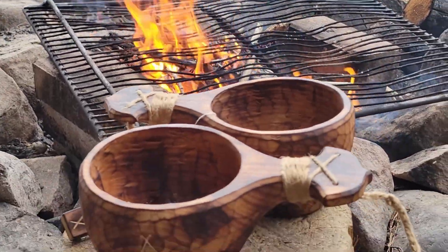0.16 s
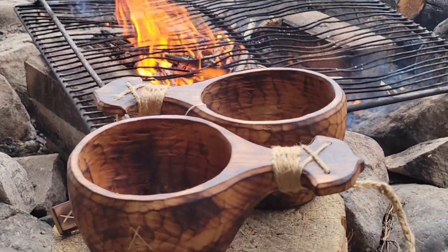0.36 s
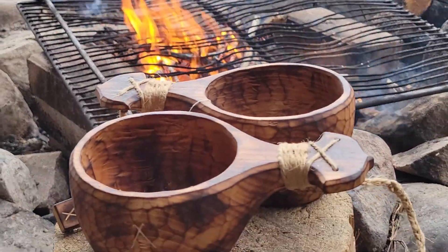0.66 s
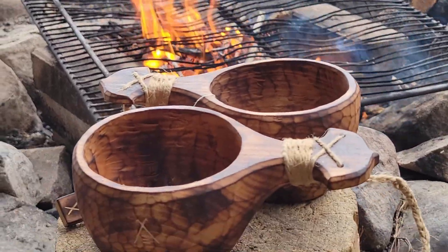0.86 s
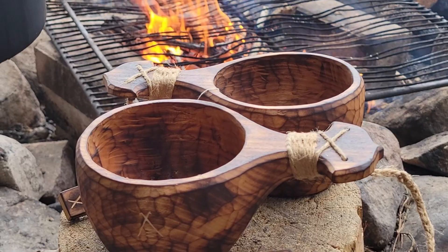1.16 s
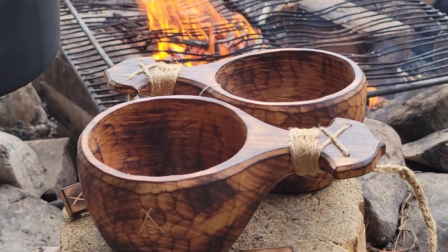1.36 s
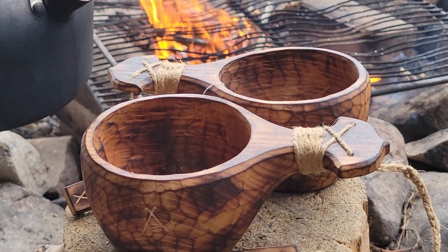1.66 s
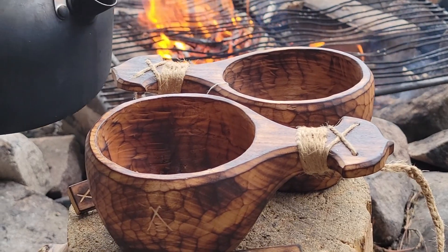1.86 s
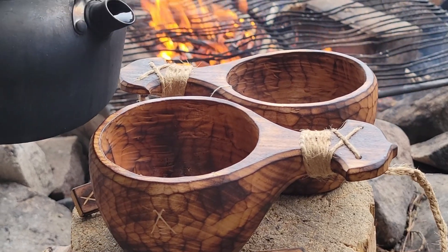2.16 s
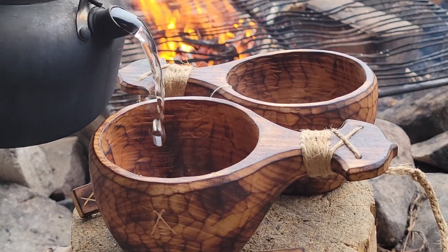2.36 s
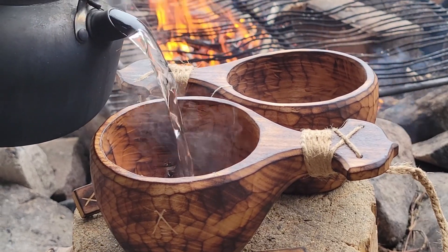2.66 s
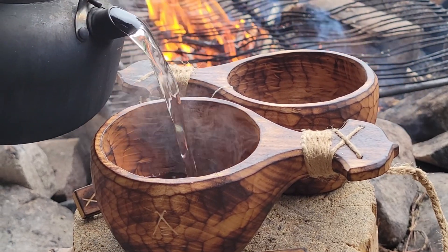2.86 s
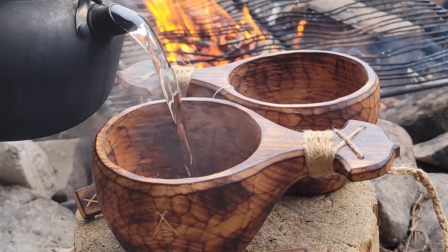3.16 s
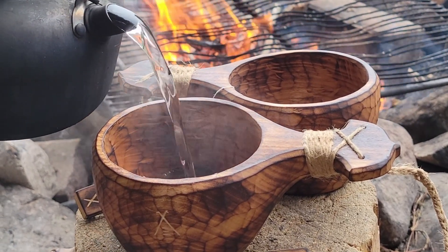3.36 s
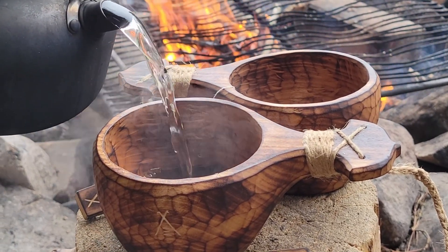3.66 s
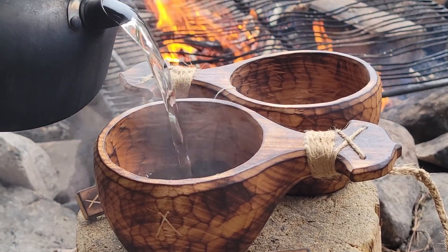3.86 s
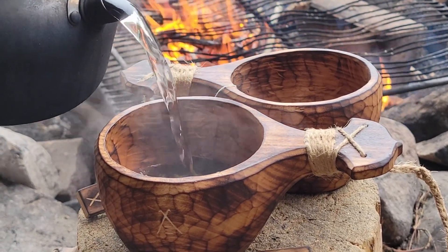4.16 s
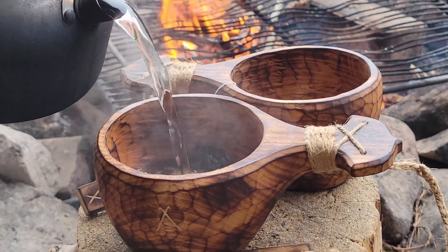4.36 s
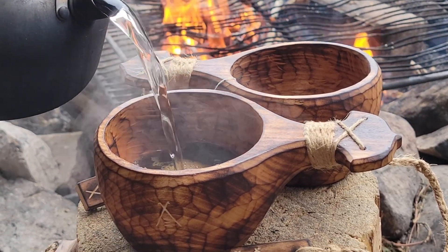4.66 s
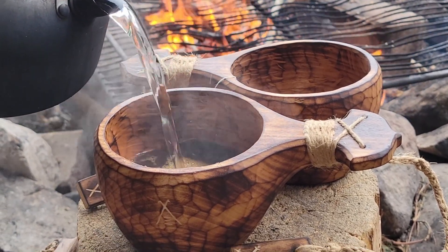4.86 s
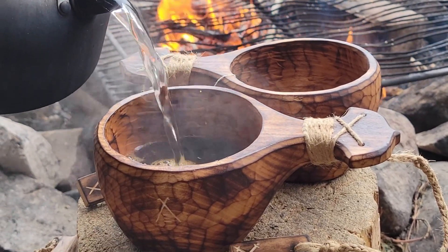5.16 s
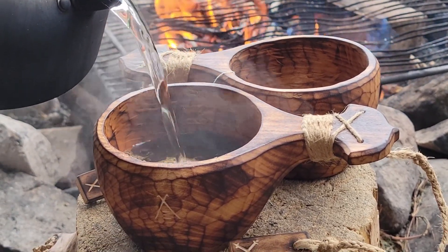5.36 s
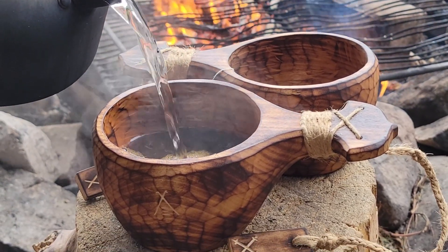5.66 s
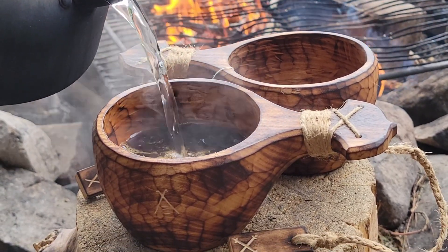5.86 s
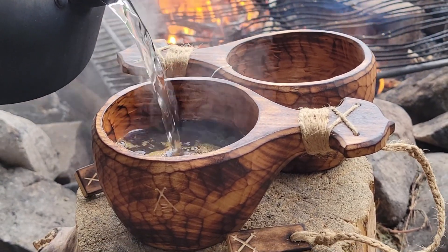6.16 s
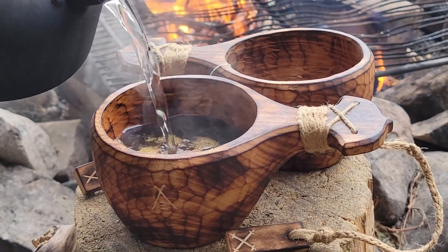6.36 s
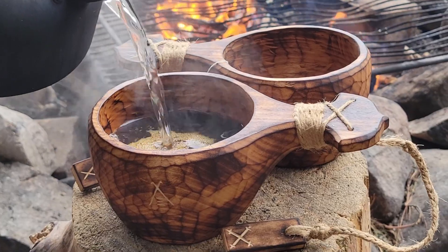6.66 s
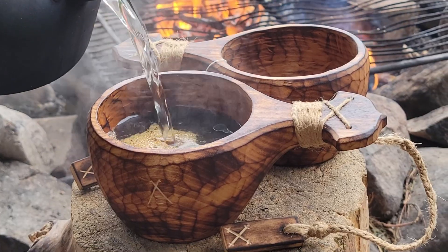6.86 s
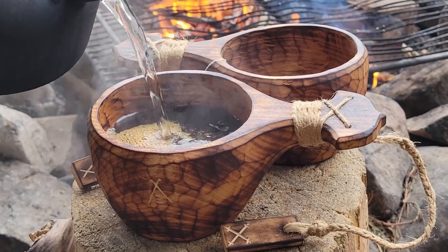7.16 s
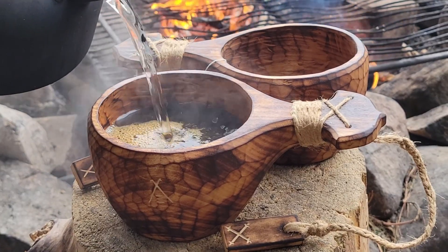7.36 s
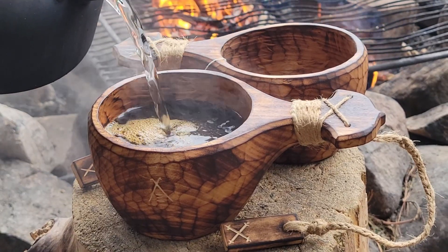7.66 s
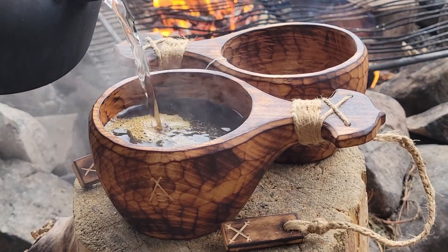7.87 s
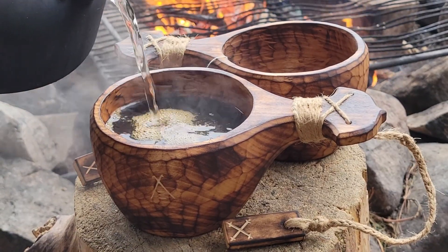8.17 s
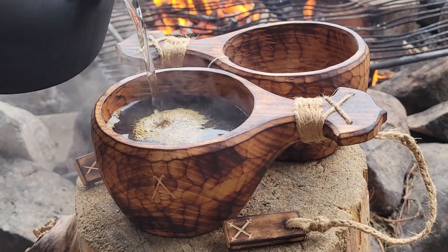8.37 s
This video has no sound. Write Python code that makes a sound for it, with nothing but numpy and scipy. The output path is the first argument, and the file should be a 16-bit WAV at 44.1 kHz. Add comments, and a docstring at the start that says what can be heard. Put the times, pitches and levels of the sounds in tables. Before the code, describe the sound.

Close stereo at an outdoor campfire: sharp pops, fine ticks and a soft low flutter run throughout. At first clothes rustle, shoes scuff on grit and wood knocks hard. From about two and a half seconds, hot water trickles from a kettle into a wooden cup, hollow drumming drops giving way to a fuller bubbly patter. A bird gives five short, falling, raspy-ended calls. Light wind bumps the microphone.

```python
"""A campfire crackles and flutters in light wind as clothes rustle and shoes scuff, close to a two-port microphone.
Wood knocks; then hot water patters from a kettle into a wooden cup, and a bird calls five times.
Fire, wind, cloth, grit and spray are shaped noise; cup and wood ring in modes; bubbles are damped tones.
Each call is a harmonic stack that slides down and ends in jitter and rasp."""
import sys
import numpy as np
from scipy import signal
from scipy.fft import rfft, irfft
from scipy.io import wavfile

SR = 44100
rng = np.random.default_rng(int(sys.argv[2]) if len(sys.argv) > 2 else 0)


def transcribe(signal):
    """Save signal, clipped to [-1, 1], as a 16-bit WAV file at the path in sys.argv[1]."""
    frames = np.atleast_2d(signal).T
    limited = np.clip(frames, -1, 1)
    pcm = np.round(limited * 32767).astype(np.int16)
    wavfile.write(sys.argv[1], SR, pcm)


N = 374850
T = np.arange(N) / SR
PORT_LAG_S, CUP_LAG_S = 0.00031, 0.00011  # delay of the right port: campsite, cup nearly in front

# Filling of the cup. Each row: time in seconds, factor on the cup's pitches, drumming of the wooden bottom in dB.
FILLING = [(2.5, 0.98, 10), (3.1, 1.07, 8), (3.8, 0.97, 7), (4.6, 1.1, 2), (5.2, 1.07, -4),
           (6.5, 1.12, -0.5), (8.5, 1.16, 0)]


def amp(db):
    """Decibels to gain."""
    return 10 ** (np.asarray(db) / 20)


def unit(x):
    """Scales to rms 1."""
    return x / np.sqrt(np.mean(x ** 2) + 1e-20)


def curve(rows, axis=1, at=T):
    """One column of a table, joined by lines, over the whole time or at one moment."""
    rows = np.asarray(rows)
    return np.interp(at, rows[:, 0], rows[:, axis])


def colour(x, points):
    """Filters by a spectrum of (Hz, dB) points."""
    hz, db = np.transpose(points)
    size = x.shape[-1]
    f = np.fft.rfftfreq(size, 1 / SR)
    gain = amp(np.interp(np.log(f + 1), np.log(hz), db))
    return irfft(rfft(x) * gain, size)


def ring(x, hz, width_hz):
    """A resonance of gain 1 that can follow a moving pitch."""
    turn = np.exp(2j * np.pi * np.cumsum(hz * np.ones(x.shape[-1])) / SR)
    r = np.exp(-np.pi * width_hz / SR)
    baseband = signal.lfilter([1 - r], [1, -r], x / turn + 1e-18)
    return 2 * (turn * baseband).real


def wander(hz, size=N):
    """Slow chance of rms 1, up to the given rate."""
    f = np.fft.rfftfreq(size, 1 / SR)
    return unit(irfft(rfft(rng.standard_normal(size)) / (1 + (f / hz) ** 4), size))


def clicks(per_s, spread_db):
    """Random impulses of either sign, mostly small and a few large."""
    size = amp(spread_db * np.minimum(rng.exponential(1, N), 4))
    return size * rng.choice([-1, 1], N) * (rng.random(N) < per_s / SR)


def swells(rows):
    """Gain of strokes that each rise to a peak and fall: rows of (s, dB, rise s, fall s)."""
    power = 0
    for s, db, rise_s, fall_s in rows:
        side_s = np.where(T < s, rise_s, fall_s)
        power = power + amp(db) ** 2 * np.exp(-((T - s) / side_s) ** 2)
    return np.sqrt(power)


def pan(db):
    """Left and right gains of unit mean power, db apart."""
    return unit(amp([[db / 2], [-db / 2]]))


def ports(x, lag_s=PORT_LAG_S):
    """A sound from the left reaches the right port a little later."""
    t = np.arange(len(x)) / SR
    late = np.roll(x, round(lag_s * SR)) * (t >= lag_s)
    return np.array([x, late])


def scattered(left, right, hz):
    """Both ports share the sound well below hz; well above, each hears its own."""
    f = np.fft.rfftfreq(N, 1 / SR)
    same = 1 / np.sqrt(1 + (f / hz) ** 4)
    near, late = ports(left)
    far = irfft(same * rfft(late) + np.sqrt(1 - same ** 2) * rfft(right), N)
    return np.array([near, far])


def add(mix, s, sound):
    """Mixes a sound in at time s."""
    part = mix[:, max(round(s * SR), 0):][:, :sound.shape[1]]
    part += sound[:, :part.shape[1]]


def trees(x, t60):
    """Sparse, weak echoes from trunks and ground."""
    t = np.arange(SR // 2) / SR
    sparse = rng.standard_normal((2, len(t))) * (rng.random((2, len(t))) < .04)
    taps = sparse * amp(-60 * t / t60) * (t > .006)
    return signal.oaconvolve(x, taps / np.linalg.norm(taps[0]), axes=1)[:, :N]


def wind(trim_db=-2, buffet_db=0.5):
    """Gusts buffet the ports as low noise, partly common and partly each port's own."""
    # Each row: time in seconds, gust strength in dB before the trim.
    gusts = [(0, -54), (1.6, -55), (1.76, -37), (1.88, -47), (2.12, -34), (2.55, -58), (3.8, -63),
             (4.08, -40), (4.5, -74), (5.05, -39), (5.4, -48.5), (5.73, -28.5), (6.15, -38), (6.45, -36.5),
             (7.08, -52), (7.35, -38), (7.75, -34.5), (8.5, -40)]
    # Wind on the ports. Each row: frequency in Hz, level in dB.
    gust_spectrum = [(10, 4), (30, -13), (50, -1), (68, 4.5), (90, -1), (140, -26), (400, -37), (1000, -78)]
    noise = rng.standard_normal((2, N)) + 0.72 * rng.standard_normal(N)
    gust = unit(colour(noise, gust_spectrum))
    return gust * amp(curve(gusts) + trim_db + buffet_db * wander(9.7)) * pan(8.0)


def flames(roar_db=-43, flutter_db=1.5, apart=0.33):
    """Low noise of the flames flutters and flares up, mostly common to both ports."""
    # Flare-ups. Each row: peak in seconds, level in dB, rise in seconds, fall in seconds.
    flares = [(.55, -41, 0.074, 0.032), (2.94, -40.5, 0.021, 0.026), (4.27, -38, 0.018, 0.023),
              (7.64, -35.5, 0.029, 0.047), (7.88, -42.5, 0.1, 0.13)]
    # Each row: frequency in Hz, level in dB.
    roar_spectrum = [(25, -15), (60, 0.5), (115, 1), (170, -6), (240, -5), (290, -13), (350, -35.5),
                     (500, -23.5), (900, -71), (2000, -94)]
    noise = rng.standard_normal(N) + apart * rng.standard_normal((2, N))
    burn = np.hypot(amp(roar_db + flutter_db * wander(9.8)), swells(flares))
    return unit(colour(noise, roar_spectrum)) * burn


def embers(hiss_db=-51, tick_db=-59, per_s=110, spread_db=7.0, drift_db=1.6, flicker_db=2.05):
    """Sizzle of the logs as wavering noise, with many tiny damped ticks."""
    # Hiss. Each row: frequency in Hz, level in dB.
    hiss_spectrum = [(100, 12), (400, 13.5), (800, 7), (1300, 3.5), (2200, 0), (3300, 9.5), (4800, 3.5),
                     (7000, 10.5), (12000, -1.5), (16000, -4.5)]
    waver_db = drift_db * wander(1.1) + flicker_db * wander(43)
    hiss = unit(colour(rng.standard_normal((2, N)), hiss_spectrum)) * amp(hiss_db + waver_db)
    t, ticks = np.arange(400) / SR, np.zeros((2, N))
    for hz in np.geomspace(3000, 14000, num=8):
        burst = rng.standard_normal((2, len(t))) * np.exp(-t / 0.0001)
        tick = unit(burst) + unit(ring(burst, hz, hz / 4))
        ticks += signal.oaconvolve(clicks(per_s / 8, spread_db)[None], tick, axes=1)[:, :N]
    ticks = colour(ticks, [(800, 11), (2200, -24.0), (3200, 1), (16000, -9.5)])
    return hiss * pan(-2.5) + amp(tick_db) * unit(ticks) * pan(-25.0)


def bird(waver=0.0027, hoarse=0.051, break_s=0.017, rasp=0.72, flutter_db=2.5):
    """A clean nasal tone slides down through a fixed throat, then breaks into jitter and rasp."""
    # Calls, by their strong fourth harmonic. Each row: start in seconds, length in seconds, level in dB,
    # top in Hz, end in Hz, opening scoop in Hz, bend of the fall (1 = straight).
    calls = [(1.039, .39, -44, 3767, 3120, 130, .28), (1.601, 0.35, -42.5, 4010, 2978, 698, .44),
             (2.192, 0.37, -35.5, 3517, 3040, 277, 1.21), (4.276, .41, -44.5, 3505, 3053, 30, 0.97),
             (4.994, 0.38, -43.5, 3528, 2916, 40.4, 1.16)]
    # Throat. Each row: frequency in Hz, gain in dB.
    throat = [(1550, -28), (1750, -35), (2350, -19.5), (2620, -28), (2950, -3.5), (3520, -2), (3850, -13),
              (4100, -20.5), (4350, -28), (5000, -38), (6600, -51)]
    scoop_s, rise_s, fade_s, hoarse_s = 0.0228, 0.034, 0.059, 0.064
    out = np.zeros((2, N))
    for s, length, db, top_hz, end_hz, scoop_hz, bend in calls:
        t = np.arange(0, length, 1 / SR)
        fall_hz = top_hz + (end_hz - top_hz) * (t / length) ** bend
        pitch_hz = (fall_hz - scoop_hz * np.exp(-t / scoop_s)) / 4
        rough = .5 + .5 * np.tanh((t - length + hoarse_s) / (2 * break_s))
        jitter = (waver + hoarse * rough) * wander(410, len(t))
        turns = np.cumsum(pitch_hz * (1 + jitter)) / SR
        tone = 0
        for k in range(2, 9):  # moving air makes each harmonic fade in and out by itself
            throat_db = np.interp(k * pitch_hz, *np.transpose(throat))
            gain = amp(throat_db + flutter_db * wander(8.7, len(t)))
            tone = tone + gain * np.sin(2 * np.pi * k * turns)
        rasp_spectrum = [(1800, -52), (2700, -8), (3200, -2), (4000, 0), (4600, -12), (7000, -29)]
        noise = unit(colour(rng.standard_normal(len(t)), rasp_spectrum))
        voice = unit(tone) * (1 - rough / 2) + rasp * rough * noise
        envelope = np.minimum(t / rise_s, 1) * np.minimum((length - t) / fade_s, 1)
        add(out, s, ports(voice * envelope * amp(db)) * pan(-8.5))
    return out


def shuffle(grain=0.54):
    """Clothes rub and shoes grind on grit: dense tiny slips under each stroke."""
    # Swishes of clothing. Each row: peak in seconds, level in dB, rise in seconds, fall in seconds.
    swishes = [(.06, -37.5, 0.051, 0.019), (.16, -38.5, 0.067, 0.061), (.3, -45.5, .06, 0.05),
               (.59, -37.5, 0.031, 0.064), (.86, -41.5, 0.063, 0.047), (.935, -39.5, 0.038, 0.024)]
    # Rubbing cloth. Each row: frequency in Hz, level in dB.
    cloth_spectrum = [(150, 11.5), (500, 8.5), (1000, 7.5), (1600, 6.5), (2500, 2), (4000, 6), (7000, 4.5),
                      (11500, -4.5), (13500, -14), (16000, -15.5)]
    # Shoe scuffs. Each row: peak in seconds, level in dB, rise in seconds, fall in seconds.
    scuffs = [(0.129, -34, 0.0045, 0.0088), (.146, -25, 0.0025, 0.0039), (.184, -32, 0.0076, 0.014),
              (.355, -36, 0.015, 0.03), (0.548, -36.5, 0.016, 0.0077), (0.849, -36, 0.015, 0.013),
              (1.45, -27, .018, .015), (1.484, -21, 0.019, 0.021)]
    # Grit under the shoes. Each row: frequency in Hz, level in dB.
    grit_spectrum = [(120, -29), (300, -12), (420, -15.5), (570, -2), (680, -8.5), (740, -9), (820, -2),
                     (900, -2), (1200, -1), (1700, -5), (2100, -8.5), (2800, -23), (4000, -8),
                     (5200, -19.5), (7500, -26), (15000, -47)]
    rub_db, settle_s, settle_db_per_s = -48, 1.44, 10.5  # rubbing fades as the person settles

    def slips(per_s):
        return rng.standard_normal(N) + grain * unit(clicks(per_s, 5.2))

    rub = amp(rub_db - settle_db_per_s * np.maximum(T - settle_s, 0))
    cloth = unit(colour(scattered(slips(4000), slips(4000), 1400), cloth_spectrum))
    shoes = unit(colour(scattered(slips(1500), slips(2200), 2400), grit_spectrum))
    left, right = cloth * np.hypot(rub, swells(swishes)) + shoes * swells(scuffs)
    # the body around the microphone shades the left port near 5 kHz
    left = colour(left, [(1200, 1), (5000, -3.5), (14000, 7.5)])
    right = colour(right, [(1200, -1), (5000, 2.5), (14000, 7.5)])
    return np.array([left, right])


def knock():
    """Wood rings for a few cycles; a soft contact swells instead of snapping."""
    # Each row: start in seconds, level in dB, factor on pitch and decay rate, contact in ms.
    knocks = [(.1435, -33, 0.34, 1.5), (.1911, -10.5, 0.96, 0.24), (.5455, -27.5, 0.48, 1.8),
              (.5485, -19, 0.74, 1.2)]
    # Modes of the wood at factor 1. Each row: frequency in Hz, t60 in seconds, level in dB.
    wood = [(1230, .017, 5.5), (1320, 0.019, -15), (990, 0.0091, -35)]
    out, t = np.zeros((2, N)), np.arange(2500) / SR
    for s, level_db, factor, contact_ms in knocks:
        modes = 0
        for hz, t60, db in wood:
            modes = modes + amp(db - 60 * t * factor / t60) * np.sin(2 * np.pi * hz * factor * t)
        swell = 1 - np.exp(-(t * 1e3 / contact_ms) ** 2)
        add(out, s, amp(level_db) * ports(modes * swell))
    return out


def bubbles(low_hz, high_hz, per_s, cycles):
    """Trapped bubbles of many sizes, each a damped tone that rises as it nears the surface."""
    t, out = np.arange(1500) / SR, np.zeros((2, N))
    for hz in np.geomspace(low_hz, high_hz, num=16):
        tone = np.sin(2 * np.pi * hz * t * (1 + 3 * t))
        blip = tone * np.exp(-t * hz / cycles) * (1 - np.exp(-t * hz))
        train = signal.oaconvolve(clicks(per_s / 16, 2.8), blip)[:N]
        out += ports(train, CUP_LAG_S) * pan(rng.normal(0, 2))
    return unit(out)


def cup(drive):
    """Blows ring the cup; filling shifts its pitches and muffles the wooden bottom."""
    # Each row: frequency in Hz before the filling factor, width in Hz, level in dB, L-R in dB.
    modes = [(510, 88, -1.5, 13), (918, 153, -1, -10.5), (1022, 325, -5, 13), (1228, 95, 7.5, 8.5),
             (1585, 87, -5, -23), (2920, 670, -8.5, -6)]
    factor, drum = curve(FILLING), amp(curve(FILLING, axis=2))
    out = 0
    for hz, width_hz, db, side_db in modes:
        mode = drive
        for _ in range(2):  # two wider resonances in series
            mode = ring(mode, hz * factor, 1.43 * width_hz)
        bottom = drum if 700 < hz < 1200 else 1
        out = out + ports(amp(db) * mode * bottom, CUP_LAG_S) * pan(side_db)
    return out


def stream(per_s=600, spread_db=4.0, lumpy_db=3.5, drum_slope=1.22, gurgle_db=-7, spray_db=-14, fizz_db=-6):
    """The stream breaks into drops that patter in the cup, trap bubbles and throw fine spray."""
    # Fall into the cup. Each row: time in seconds, strength in dB.
    pour = [(2.45, -77), (2.7, -64.5), (3.05, -58.5), (3.35, -60.5), (3.6, -60), (3.8, -56.5), (4.5, -51),
            (5.0, -54), (5.65, -52), (6.05, -56.5), (6.7, -53), (7.1, -57.5), (7.5, -54), (7.9, -60.5),
            (8.5, -60.5)]
    # Bursts of small bubbles from air dragged under. Each row: peak in seconds, level in dB, length in seconds.
    fizzes = [(4.073, -44, .025), (8.043, -47.5, 0.034), (8.375, -59, 0.054)]
    flow, strength_db = amp(lumpy_db * wander(19)), curve(pour)
    drops = clicks(per_s, spread_db) * flow
    gurgle_gain = amp(drum_slope * curve(FILLING, axis=2) + gurgle_db)
    gurgle = bubbles(803, 1393, per_s=200, cycles=5) * flow * gurgle_gain
    bursts = swells([(s, db, length, length) for s, db, length in fizzes])
    fizz_gain = np.hypot(amp(strength_db + fizz_db), bursts)
    fizz = bubbles(2840, 3010, per_s=370, cycles=6.8) * flow * fizz_gain
    mist = rng.standard_normal((2, 200)) * np.exp(-np.arange(200) / 50)
    spray = signal.oaconvolve(drops[None], mist, axes=1)[:, :N]
    spray = colour(spray, [(300, -3), (1200, 42), (2200, -77), (3200, 18), (6500, 25.0), (15000, -24)])
    return amp(strength_db) * (unit(cup(drops)) + gurgle + amp(spray_db) * unit(spray)) + fizz


def splats(bubble_db=-1, slap_db=-3, slap_s=0.0051, tick_db=-18, tick_s=.0035, after_db=-15,
           after_s=0.027, scatter=0.12, tick_slope=1.1):
    """Larger lumps of water tick on the surface, slap the cup and trap a bubble, with smaller ones just after."""
    # Each row: start in seconds, level in dB, bubble pitch in Hz.
    lumps = [(2.784, -37.5, 1216), (2.995, -32.5, 990), (3.03, -31, 1290), (3.086, -27, 1210),
             (3.168, -35, 1380), (3.202, -37, 1040), (3.46, -34.5, 1290), (3.654, -40, 1340),
             (3.68, -28.5, 987), (3.726, -38, 1010), (3.769, -27.5, 1200), (3.83, -31, 930),
             (3.9, -34, 1310), (3.947, -30, 760), (4.039, -33.5, 1340), (4.095, -31.5, 1350),
             (4.13, -32, 1310), (4.196, -32.5, 900), (4.307, -31, 577), (4.321, -28, 840),
             (4.348, -22.5, 800), (4.379, -31.5, 1250), (4.529, -29, 590), (4.627, -26, 566),
             (4.666, -32, 1400), (4.943, -31, 1430), (5.024, -33.5, 1400), (5.262, -35.5, 1380),
             (5.479, -31.5, 1330), (5.686, -34, 1320), (5.761, -33, 1340), (5.931, -33, 1350),
             (6.237, -33, 1400), (6.318, -31.5, 1350), (6.351, -36, 1380), (6.378, -33.5, 1430),
             (6.417, -30, 1360), (6.473, -34, 1370), (6.518, -33.5, 1390), (6.556, -36, 1380),
             (6.674, -28.5, 1300), (6.723, -36, 1370), (6.894, -31, 1020), (7.087, -39.5, 1490),
             (7.447, -38.5, 530), (7.718, -37.5, 900), (8.34, -31, 1790)]
    # Side to which the cup throws a bubble. Each row: pitch in Hz, L-R in dB.
    beam = [(570, 4), (930, -6), (1250, 3), (1400, 18), (1840, 10)]
    # Lump hitting the surface. Each row: frequency in Hz, level in dB.
    tick_spectrum = [(500, -5), (1700, -1), (2400, -3), (3050, 7), (3800, -6), (7000, -4), (14000, -16)]
    out, slaps, t = np.zeros((2, N)), np.zeros((1, N)), np.arange(1500) / SR

    def plop(hz, cycles=3.5):
        tone = np.sin(2 * np.pi * hz * t * (1 + 2 * t))
        blip = tone * np.exp(-t * hz / cycles) * (1 - np.exp(-t / 0.00049))
        return ports(blip, CUP_LAG_S) * pan(np.interp(hz, *np.transpose(beam)))

    for s, db, hz in lumps:
        tick = colour(rng.standard_normal((2, len(t))), tick_spectrum) * np.exp(-t / tick_s)
        drum_db = curve(FILLING, axis=2, at=s)  # less drumming: louder ticks, weaker extra bubbles
        add(out, s, amp(db) * (amp(bubble_db) * plop(hz) + amp(tick_db - tick_slope * drum_db) * tick))
        for late, size in rng.random((3, 2)):
            small = plop(hz * (1 + scatter * (2 * size - 1)))
            add(out, s + after_s * late, amp(db + after_db + drum_db) * small)
        slap = unit(rng.standard_normal((1, len(t))) * np.exp(-t / slap_s))
        add(slaps, s, amp(db + slap_db) * slap)
    return out + cup(slaps[0])


def faint_pops(count=28):
    """Small pops at random moments, each with its own colour."""
    # Lowest and highest draw. Each row: level in dB, treble in dB, ring in Hz, decay in ms, L-R in dB.
    draw_range = [(-37, -7.5, 3050, 1.4, -19), (-34.5, 5, 7060, 4.4, -3)]
    low, high = np.array(draw_range)
    draw = rng.random((count, 6))
    return [(u[0] * N / SR, *(low + u[1:] * (high - low))) for u in draw]


def pops(treble_trim_db=1, ring_db=-2, ring_width_hz=450, tail_db=-23, tail_s=0.0091):
    """Gas pockets burst in the logs: a sharp crack, a short ring of split wood, scatter from the stones."""
    # Loud pops. Each row: time in seconds, level in dB, treble in dB before the trim, ring in Hz,
    # decay in ms (at least 0.3 is used), L-R in dB.
    loud_pops = [(0.143, -23.5, -14, 3850, 2, 5), (0.1912, -12.5, -7, 1420, 1.3, -8.5),
                 (0.4173, -21, -5.5, 7000, 2, -4), (0.7898, -17, 1, 5840, 2.9, -8),
                 (1.5518, -22, -20, 4130, 5.8, -4), (1.7164, -15, -3, 7400, 2.5, -5),
                 (1.8163, -45, 12, 3170, 2.9, -2), (1.8964, -30.5, -8, 3120, 4.2, 1),
                 (2.2558, -33.5, 5.5, 3630, 1.5, -8), (2.446, -33.5, 11.5, 3250, 1.4, -6),
                 (2.4967, -28, -5, 3220, 5, -3), (3.2043, -32, -3, 7700, 3.2, -5),
                 (3.453, -29, -7, 7340, 1.9, -1), (3.682, -37.5, 7.5, 5900, 5.2, -5),
                 (3.7737, -34.5, -4, 5680, 1.6, -7), (3.8345, -38, -14, 6040, 1.4, -10),
                 (3.9027, -32, 0, 5500, 4.5, -5), (4.063, -30.5, -20, 2470, 4.7, -7),
                 (4.191, -27, -6, 2900, 13, -1), (4.298, -29, -26, 3500, 1.9, 17),
                 (4.338, -28.5, -6, 4650, 5.1, -5), (4.357, -30.5, -5, 3360, 2.6, 0),
                 (4.4483, -35, -0.5, 3280, 1.9, -5), (4.6434, -20, -18, 3860, 2.4, -7),
                 (4.763, -27, -18, 3800, 2.7, -1), (5.1314, -21, -7.5, 4330, 3.8, -5),
                 (5.2223, -27.5, -4, 3150, 1.7, -4), (5.3364, -25, -20, 5400, 1.5, 3),
                 (5.451, -28, -11, 7600, 4.7, -8), (6.0793, -38, 3, 6590, 3.7, -17),
                 (6.2585, -35.5, 6.5, 7500, 1.9, -9), (6.418, -27, -27, 1830, 1.4, -4),
                 (6.522, -31.5, -7, 2980, 2.5, -9), (6.6064, -34.5, 7.5, 5900, 1.8, -7),
                 (6.6876, -36, -1, 3000, 1.2, -12), (6.8151, -28.5, 6, 3800, 0.86, -6),
                 (6.8374, -38, 12.5, 7280, 0.68, -17), (6.8483, -33.5, -4, 5300, 2.2, -6),
                 (6.8948, -23, -8, 4000, 5.7, -4), (6.9374, -30.5, -24, 1780, 0.7, 3),
                 (7.2464, -20.5, -13, 3970, 3.5, -2), (7.268, -37, 5, 3960, 2.1, -18),
                 (7.7186, -21, -5, 6640, 1.8, -13), (7.801, -27.5, 2, 4020, 2.4, -6),
                 (7.9444, -30, 9, 5840, 2.3, -5), (8.3815, -34, 0, 2980, 0.29, -6)]
    # Body of a pop. Each row: frequency in Hz, level in dB.
    snap_spectrum = [(300, -37), (600, -3.5), (1000, -5), (2200, -18.5), (3200, 7), (5000, 1), (7500, 5.5),
                     (10000, 3.5), (12000, -29)]
    treble_spectrum = [(6000, -7), (9000, 9.5), (11000, 6.0), (16000, 1.0)]
    out, t = np.zeros((2, N)), np.arange(2048) / SR
    one_ms = np.sqrt(SR / 1000 / len(t))  # levels count as rms over 1 ms
    for s, db, treble_db, hz, decay_ms, side_db in loud_pops + faint_pops():
        noise = rng.standard_normal((3, 2, len(t)))
        decay = np.exp(-t * 1e3 / max(decay_ms, .3)) + amp(tail_db) * np.exp(-t / tail_s)
        fade = decay * (1 - np.exp(-t / .00008))  # short fade-in of each pop
        crack = unit(colour(noise[0], snap_spectrum) * fade)
        tone = unit(ring(noise[1] * fade ** 2, hz, ring_width_hz))
        treble = unit(colour(noise[2], treble_spectrum) * fade)
        burst = unit(crack + amp(ring_db) * tone) + amp(treble_db + treble_trim_db) * treble
        add(out, s - .0003, amp(db) * one_ms * pan(side_db) * burst)
    return out


def scene():
    """Fire, wind, footsteps, pouring and the bird, in the open air."""
    crackle, call = pops(), bird()
    echoes = amp(-15.0) * trees(crackle, t60=0.1) + amp(-3.5) * trees(call, t60=0.3)
    fire = crackle + embers() + flames()
    water = stream() + splats()
    return fire + wind() + shuffle() + knock() + water + call + echoes


def record(dry):
    """The notch of the microphone ports, then a 16 kHz band limit."""
    # Each row: frequency in Hz, gain in dB.
    notch = [(7300, 1), (8200, -5.5), (9000, -17.5), (10200, -12), (11200, -1.5), (12200, 6)]
    edge = signal.firwin(255, 16000, window=("kaiser", 7), fs=SR)
    return signal.oaconvolve(colour(dry, notch), edge[None], "same")


dry = scene()
out = record(dry)
transcribe(out)
```